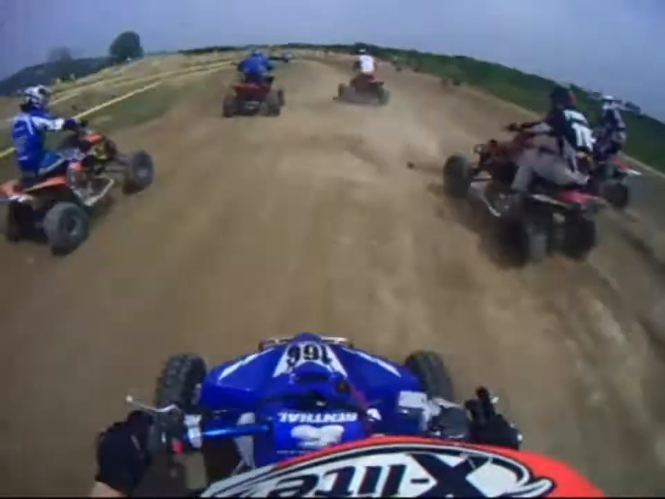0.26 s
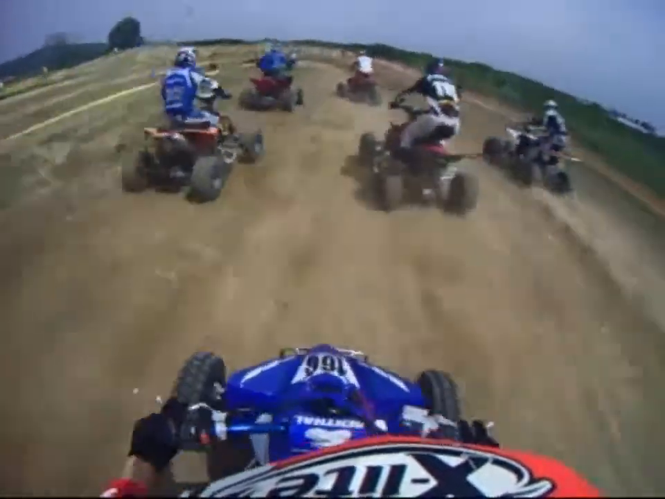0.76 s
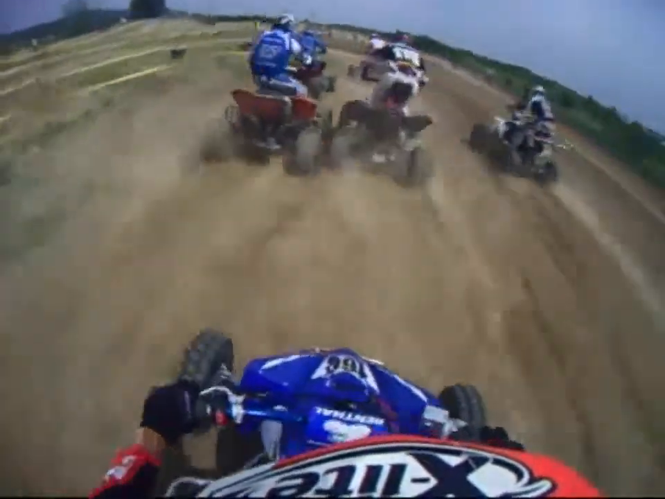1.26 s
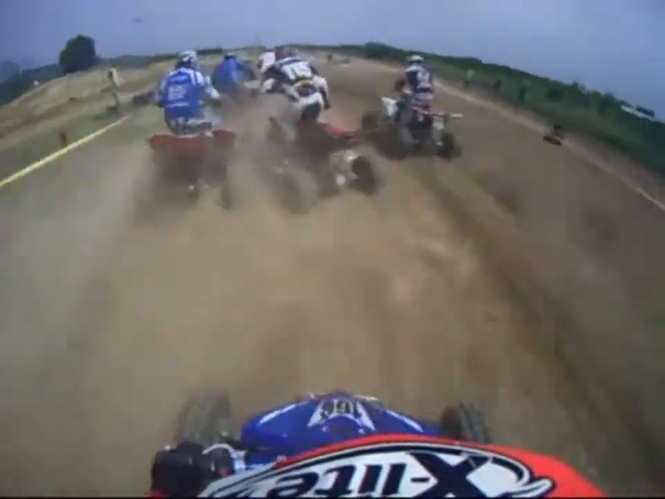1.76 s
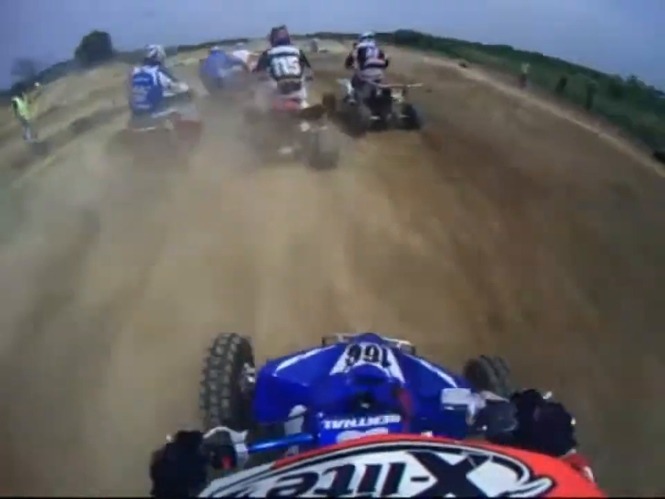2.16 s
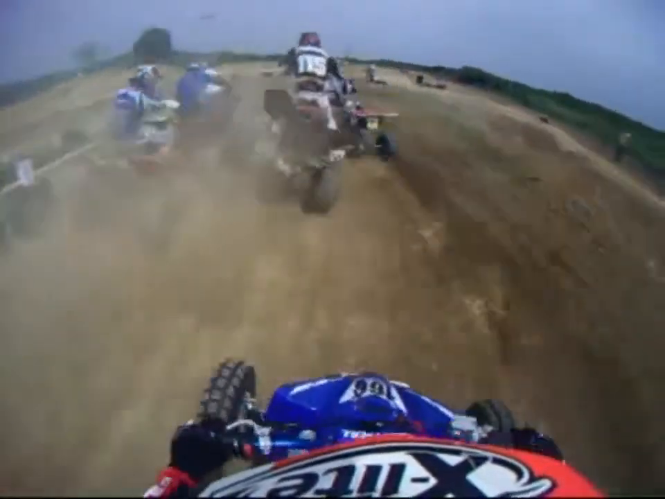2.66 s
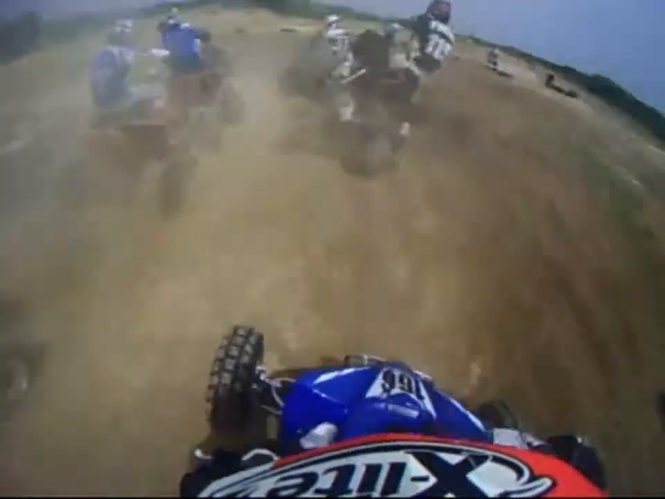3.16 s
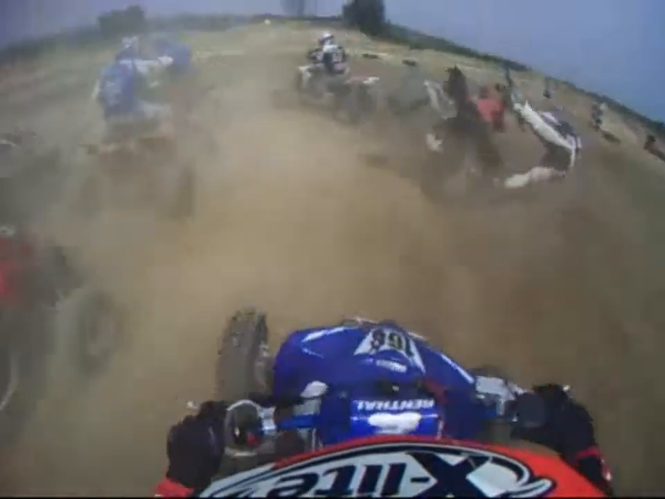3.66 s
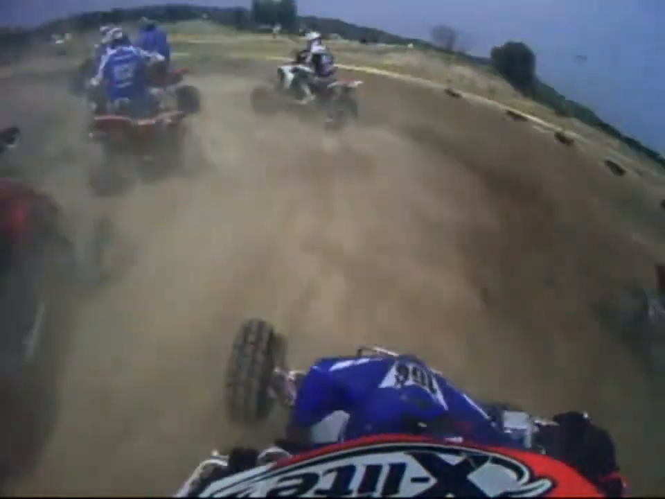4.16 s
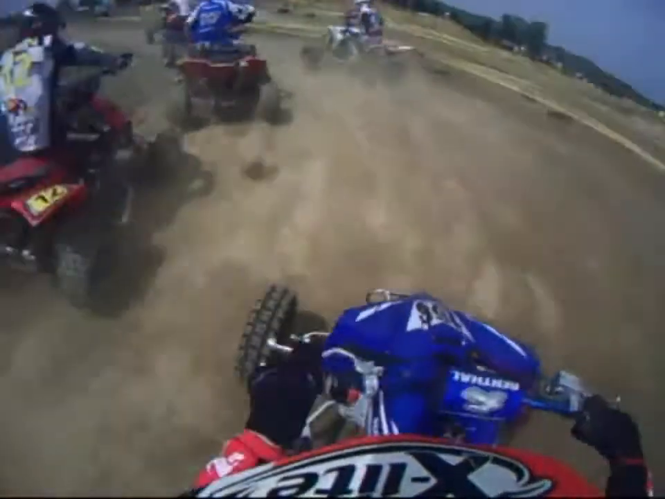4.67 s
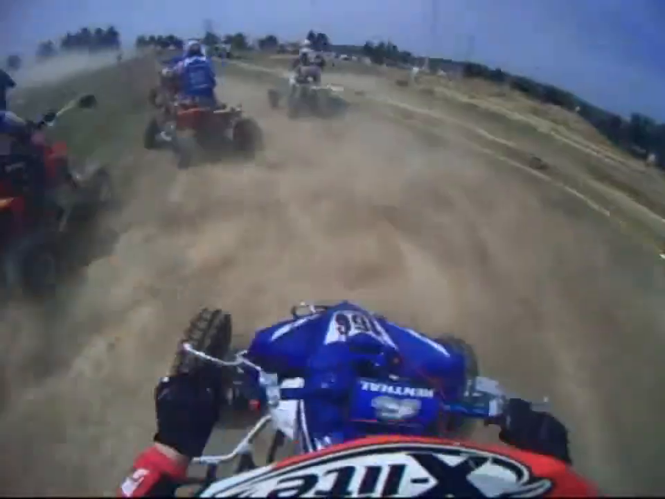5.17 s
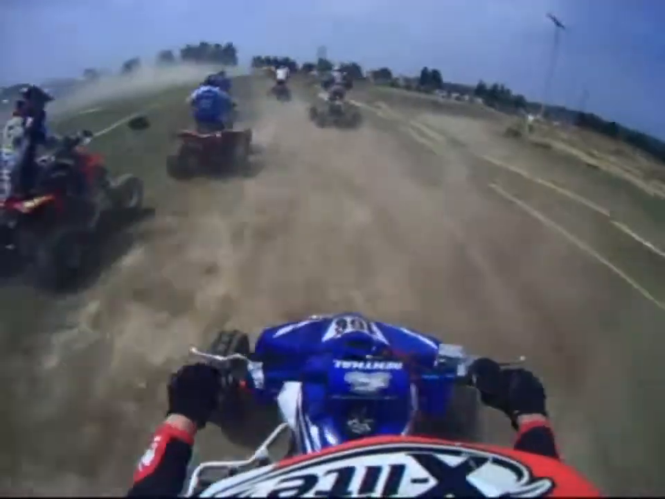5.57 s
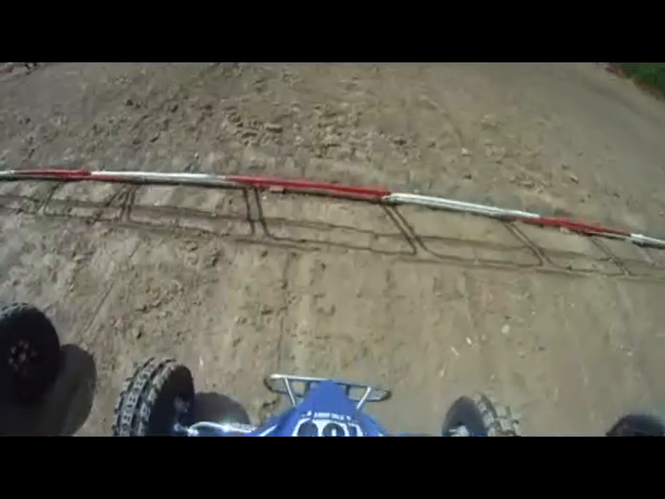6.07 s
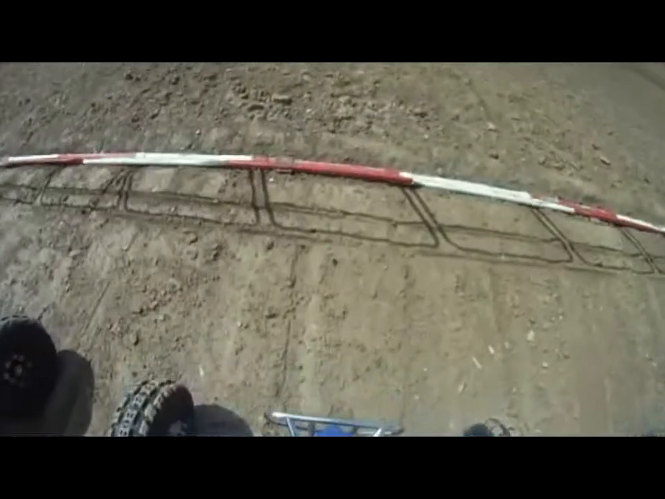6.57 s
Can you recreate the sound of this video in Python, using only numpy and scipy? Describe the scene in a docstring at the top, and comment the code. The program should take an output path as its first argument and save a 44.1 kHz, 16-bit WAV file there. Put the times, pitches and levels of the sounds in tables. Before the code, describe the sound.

From a microphone shut in a plastic case on a rider's helmet outdoors, a single-cylinder quad barks at open throttle, with sharp cracks, then quietens into distant pack rumble and wind thumps. Throttle bursts return and climb, ease off, then a very short silence cuts to far louder, brighter revving among several engines.

```python
"""Single-cylinder quad bikes race on dirt, heard by a helmet camera shut in a plastic case; a cut leads to revving
at the start gate. Each firing is a burst of gas noise with a shrill ring near 2.4 kHz, over a thump and a pipe note.
The hardest firings, backfires and clacks add short bursts; pipes of near and neighbouring engines sing as gliding
multiples of a firing rate, and the pack roars all around. Wind is deep buffeting noise with low damped thumps.
Both cameras sample slowly, so a mirror image of the sound stands above half their rate."""
import sys
import numpy as np
from scipy import signal
from scipy.fft import rfft, irfft, next_fast_len
from scipy.io import wavfile
from scipy.ndimage import uniform_filter1d

SR = 44100
rng = np.random.default_rng(int(sys.argv[2]) if len(sys.argv) > 2 else 0)


def transcribe(signal):
    """Save signal, clipped to [-1, 1], as a 16-bit WAV file at the path in sys.argv[1]."""
    frames = np.atleast_2d(signal).T
    limited = np.clip(frames, -1, 1)
    pcm = np.round(limited * 32767).astype(np.int16)
    wavfile.write(sys.argv[1], SR, pcm)


def makeup_ratio(level_db):
    """Linear amplitude ratio for a level in decibels (20 dB per factor of ten)."""
    decades = np.asarray(level_db, float) / 20
    return 10 ** decades


N = 300762
T = np.arange(N) / SR
SIZE = next_fast_len(N + 8192)  # room for filters to ring out
HZ = np.arange(SIZE // 2 + 1) * SR / SIZE + 1e-3  # just above zero, so that its logarithm exists


# Spells of open throttle on the nearest engines. Each spell holds: rows (t/s, firing rate f/Hz, about),
# blast level/dB at each row, level/dB of the part under 1.5 kHz at each row,
# and (level/dB of extra sizzle, level/dB of ground echo); all levels are relative
THROTTLE_SPELLS = [ ([(.012, 66), (.277, 66), (.325, 66), (.4, 68), (.471, 70), (.53, 68), (.662, 68)],
                   [-23, -20, -19, -16, -18, -20, -30], [-2, 2, -1, -2, -2, 1, 4], (-9, -6)), ([(1.587, 56),
                   (1.625, 56), (1.664, 58), (1.732, 60), (1.827, 64), (1.856, 65), (1.873, 65),
                   (1.921, 63), (1.968, 62), (2.001, 61), (2.035, 61), (2.085, 60)],
                   [-32, -32, -26, -31, -37, -23, -21, -39, -30, -28, -34, -42],
                   [0, 10, 7, 7, 4, 0, 1, 4, 5, 1, 4, 4], (6, -3)), ([(3.013, 25), (3.085, 31), (3.141, 39),
                   (3.158, 45), (3.254, 42), (3.298, 42)], [-36, -33, -41, -33, -34, -41],
                   [7, 7, 6, 4, 4, 5], (3, -3)), ([(3.316, 38), (3.343, 34), (3.371, 40), (3.416, 50),
                   (3.45, 64), (3.464, 72)], [-22, -18, -16, -19, -18, -19], [-6, -2, -5, -2, -1, 2],
                   (10, -2)), ([(3.707, 64), (3.738, 64), (3.807, 56)], [-30, -25, -34], [5, 3, 2],
                   (5, -2)), ([(3.834, 40), (3.907, 43), (3.975, 46), (4.016, 49), (4.113, 54), (4.193, 68),
                   (4.267, 67), (4.366, 72), (4.45, 68)], [-31, -23, -22, -23, -22, -25, -25, -32, -28],
                   [-6, -6, -7, -6, -3, 1, 0, 1, -1], (-6, -8)), ([(4.546, 60), (4.613, 63), (4.691, 62),
                   (4.735, 66), (4.78, 70), (4.93, 77), (5.021, 76), (5.116, 74), (5.222, 75), (5.287, 76),
                   (5.361, 62)], [-29, -22, -29, -37, -29, -20, -21, -21, -24, -22, -23],
                   [-2, -4, 0, 0, -3, -4, -4, -1, 3, 1, 4], (0, -12)), ([(5.435, 56), (5.601, 60),
                   (5.733, 60), (5.866, 60)], [-24, -27, -30, -32], [3, 4, 3, 5], (-9, -8)), ([(5.95, 55),
                   (6.023, 55), (6.092, 57)], [-7, -9, -12], [3, 2, -2], (-9, -9)), ([(6.175, 52),
                   (6.229, 58), (6.304, 72), (6.319, 72), (6.343, 74), (6.443, 66), (6.535, 64), (6.63, 64),
                   (6.648, 62), (6.734, 62), (6.768, 60), (6.785, 58), (6.819, 58)],
                   [-5, -4, -5, -14, -12, -10, -8, -7, -15, -13, -12, -3, -4],
                   [-2, 2, -2, 0, 1, 1, 0, -2, -4, -4, 0, -5, -1], (-9, -10))]
# Tone of the near exhaust pipe: (f/Hz, relative level/dB)
PIPE_TONE = [(40, -18), (70, -13), (130, -15.5), (300, -32.5), (450, -7), (700, -13), (1000, -12.5),
             (1500, -22.5)]


def near_engines():
    """Each firing thumps, then blasts gas that returns off the ground and rings the case; the pipe note is more even."""
    scatter_db, even = 2.5, 0.3  # spread of blast levels; share of it that the thump follows
    jitter_s, lead_s, thump_lead_s = 0.0003, 0.002, 0.001
    echo_delay_s = 0.0045
    rows_of_spells, loads, shares, places = zip(*THROTTLE_SPELLS)
    firing_s = np.concatenate([firings(rows) for rows in rows_of_spells])
    row_s = np.concatenate(rows_of_spells)[:, 0]
    low_db = np.interp(T, row_s, np.concatenate(shares))

    # sizzle and echo change just before each new spell
    changes_s = [rows[0][0] - 0.01 for rows in rows_of_spells[1:]]
    sizzle_db, echo_db = np.array(places)[np.searchsorted(changes_s, T)].T

    level_chance, time_chance = rng.standard_normal((len(firing_s), 2)).T
    blast_db = np.interp(firing_s, row_s, np.concatenate(loads))
    ring_hz = np.where(first_shot(), 2500, 2260)
    gas = blasts(firing_s - lead_s + jitter_s * time_chance, blast_db + scatter_db * level_chance,
                 decay_s=0.0024, rise_s=0.0005, crack=4.5, ring=0.45, ring_hz=ring_hz, stray_hz=220)
    thump = strikes(firing_s - lead_s - thump_lead_s, blast_db + even * scatter_db * level_chance)
    echo = np.pad(gas, (int(echo_delay_s * SR), 0))[:N]
    gas = gas + makeup_ratio(echo_db) * echo

    rasp = makeup_ratio(-2.5) * case(gas, False)
    high_pass = signal.butter(4, 3150, "high", fs=SR, output="sos")
    sizzle = signal.sosfilt(high_pass, rasp)
    bark = makeup_ratio(-11) * case(gas, True) + makeup_ratio(10.5) * case(thump, True)
    pipe_note = makeup_ratio(25) * colour(thump, gains(PIPE_TONE))
    return rasp + makeup_ratio(sizzle_db) * sizzle + makeup_ratio(low_db) * bark + pipe_note


def firings(rows):
    """Firing times: a whole number of cycles fits between rows, while the rate glides evenly."""
    times = []
    for (s0, rate0), (s1, rate1) in zip(rows, rows[1:]):
        mean_rate = (rate0 + rate1) / 2
        u = np.linspace(0, 1, num=200)
        phase = (rate0 * u + (rate1 - rate0) * u ** 2 / 2) / mean_rate
        cycles = max(round((s1 - s0) * mean_rate), 1)
        times += list(s0 + (s1 - s0) * np.interp(np.arange(cycles) / cycles, phase, u))
    return np.array(times + [rows[-1][0]])


# The hardest firings, backfires and sharp clacks: (t/s, relative level/dB, level/dB of the part under 1.5 kHz)
HARD_BURSTS = [(0.0937, -10, -38.5), (0.3228, -10.5, -42), (0.4689, 0.5, -14), (0.6847, -8.5, -20),
               (0.6981, -14.5, -6), (1.506, -25, -4.5), (2.45, -32, -11), (3.5738, -22, -34),
               (3.834, -29, -21), (4.017, -23.5, 2), (4.093, -29, -6), (4.2647, -21, -3.5),
               (4.311, -30, -13), (4.363, -24, -15), (4.8339, -14, -7), (4.953, -23, -12),
               (4.964, -19, -14), (5.286, -17.5, -13.5), (6.1925, -11, 6.5), (6.533, -18, -19),
               (6.581, -8.5, -14), (6.6263, -11, -14)]


def hard_bursts():
    """Hardest firings, backfires and clacks: each a short burst of gas with a crack and a ring, through the case."""
    s, db, low_db = np.transpose(HARD_BURSTS)
    bang = blasts(s, db, decay_s=0.0023, rise_s=0.00067, crack=2.2, ring=0.4)
    low_gain = makeup_ratio(-7 + np.interp(T, s, low_db))
    return makeup_ratio(-2) * case(bang, False) + low_gain * case(bang, True)


# Pipes of near and neighbouring engines singing while they pull:
# (start t/s, length t/s, first firing rate f/Hz, rate at the turn f/Hz, relative level/dB, pipe resonance f/Hz)
PIPE_NOTES = [(-.06, 0.38, 59.9, 69.3, -34.5, 308), (.18, 0.29, 63.26, 62.5, -36.5, 128),
              (0.405, 0.1, 59.8, 69.6, -32.5, 297), (0.721, 0.2, 60.06, 68.8, -38, 330),
              (1.618, 0.41, 56.3, 65, -49.5, 120), (3.1, 0.13, 86.8, 86.4, -43.5, 170),
              (3.664, 0.14, 57.6, 69.3, -38.5, 320), (1.611, .12, 54, 61.1, -45.5, 450),
              (4.4, 0.25, 62.3, 64.2, -44.5, 130), (4.86, 0.16, 79.7, 84.4, -44.5, 170),
              (5.05, 0.65, 69.4, 79, -62, 230), (5.46, 0.17, 44.8, 54.2, -55, 105),
              (4.8, 0.73, 70, 78.6, -45, 380), (2.1, 0.29, 73.6, 65.1, -46.5, 139),
              (2.55, 0.5, 51.9, 55.7, -55.5, 161), (6.3, 0.36, 65.74, 62.14, -32, 417),
              (5.623, 0.34, 55.7, 68.1, -35, 299), (5.95, 0.31, 53.7, 65.95, -32, 110),
              (6.188, 0.15, 60.1, 73.9, -27, 66), (6.45, 0.21, 63.34, 68.4, -22.5, 108),
              (6.7, 0.11, 63.4, 70.1, -23.5, 115)]


def pipe_notes():
    """Clean multiples of a firing rate that glides to a turn and starts back, loudest near the pipe's resonance."""
    turn, fade_share = 0.632, 0.12  # as shares of the note's length
    floor_db, pipe_width_hz = -17, 74  # floor: strength of multiples far from the resonance
    out = np.zeros(N)
    k = np.arange(1, 13)[:, None]
    for s, length, hz0, hz1, db, pipe_hz in PIPE_NOTES:
        on = slice(max(int(s * SR), 0), min(int((s + length) * SR), N))
        u = np.clip((T[on] - s) / length, 0, 1)
        hz = hz0 + (hz1 - hz0) * np.sin(np.pi / 2 * u / turn)
        resonance = 1 / (1 + (2 * (k * hz - pipe_hz) / pipe_width_hz) ** 2)
        gain = makeup_ratio(db) * (makeup_ratio(floor_db) + resonance)
        phase = 2 * np.pi * np.cumsum(hz) / SR
        fade = np.clip(np.minimum(u, 1 - u) / fade_share, 0, 1)
        # k squared staggers the starting phases
        out[on] += np.sqrt(2) * fade * np.sum(gain * np.sin(k * phase + k ** 2), axis=0)
    return out


# The pack drawing off and closing in: (t/s, roar through the case level/dB, exhaust rumble level/dB), relative
PACK_LEVELS = [(0, -29, -30.5), (.28, -30, -36.5), (.5, -37, -35.5), (.85, -40.5, -37.5),
               (1.03, -42.5, -41), (1.5, -47, -41.5), (1.66, -48.5, -40.5), (2.06, -49, -42),
               (2.9, -49.5, -41.5), (3.62, -45.5, -38), (3.72, -36.5, -33.5), (3.86, -49, -40),
               (4.2, -46, -36.5), (4.5, -39, -37), (5.05, -46, -33), (5.35, -30.5, -29), (5.55, -35, -31.5),
               (5.86, -41, -37), (5.95, -19, -22), (6.13, -16, -20.5), (6.2, -23, -25), (6.31, -22, -26.5),
               (6.4, -17.5, -25), (6.6, -16.5, -21.5), (6.66, -19, -27), (6.82, -19, -25.5)]
# Three further engines, a list for each: (t/s, firing rate f/Hz)
PACK_RATES = [
    [(0, 42), (1.05, 59), (2, 57), (2.95, 35), (4.3, 45), (5.5, 37), (6.1, 52), (6.82, 60)],
    [(0, 80), (1.75, 63), (2.75, 53), (3.6, 66), (4.9, 55), (5.6, 56), (6, 71), (6.82, 67)],
    [(0, 64), (1, 73), (2.7, 80), (3.5, 50), (4.9, 82), (5.6, 79), (6, 64), (6.82, 76)],
]
# Tone of the exhaust rumble: (f/Hz, relative level/dB)
RUMBLE_TONE = [(40, -2), (70, -8), (130, -2), (200, -7), (300, -8.5), (420, -12.5), (700, -58)]


def pack():
    """Further engines: their long blasts blur into a throbbing roar over a lumpy rumble."""
    steady = 0.35  # unbroken noise beside the throb
    scatter_db, even, jitter_s = 4, 0.3, 0.0004
    roar_db, rumble_db = curve(PACK_LEVELS)
    # the part under 1.5 kHz gains on the rest as the roar fades with distance
    middle_db = np.where(first_shot(), -1, -2.5) - 0.18 * (roar_db + 44.5)

    phases = [np.cumsum(curve(rows)[0]) / SR for rows in PACK_RATES]
    firing_s = np.concatenate([np.interp(np.arange(1, p[-1]), p, T) for p in phases])
    level_chance, time_chance = rng.standard_normal((len(firing_s), 2)).T
    firing_s = firing_s + jitter_s * time_chance

    throb = unit(blasts(firing_s, scatter_db * level_chance, decay_s=0.022, rise_s=0.0016, crack=1.7))
    roar = throb + steady * rng.standard_normal(N)
    beat = strikes(firing_s, even * scatter_db * level_chance)
    middle = roar + 1.3 * unit(beat)
    tone = gains(RUMBLE_TONE)
    rumble = unit(colour(beat, tone)) + 0.5 * unit(colour(rng.standard_normal(N), tone))
    return (makeup_ratio(roar_db) * unit(case(roar, False)) + makeup_ratio(roar_db + middle_db) * unit(case(middle, True))
            + makeup_ratio(rumble_db) * unit(rumble))


# Wind thumps as gusts strike the microphone: (t/s, relative level/dB, f/Hz, time to fall by 60 dB t/s)
WIND_THUMPS = [(0.599, -11, 36, 0.24), (0.732, -11.5, 29.5, 0.16), (2.438, -7.5, 38.8, 0.15),
               (4.811, -21, 35, 0.29), (4.919, -19.5, 38, 0.39), (5.489, -16.5, 34.8, 0.2)]


def wind_thumps():
    """A gust strikes the microphone: a low sine, 29 to 39 Hz, that swells quickly and dies away."""
    onset_s = 0.022
    out = 0
    for s, db, hz, t60 in WIND_THUMPS:
        t = np.maximum(T - s, 0)
        envelope = (1 - np.exp(-t / onset_s)) * np.exp(-np.log(1000) * t / t60)
        out = out + makeup_ratio(db) * envelope * np.sin(2 * np.pi * hz * t)
    return out


# Wind on the microphone, calmer while the bike slows for the bend: (t/s, relative level/dB before the buffets)
WIND_LEVELS = [(0, -38.5), (2, -42.5), (3.4, -46), (4.4, -50), (4.8, -42), (5.86, -47), (5.95, -32),
               (6.82, -43)]


def wind():
    """Air buffets the microphone: deep noise whose level wanders at random."""
    gust_db, gust_s = 5, 0.091  # spread and smoothing length of the buffets
    hold = int(gust_s * SR)
    gusts = unit(uniform_filter1d(uniform_filter1d(rng.standard_normal(N), hold), hold))
    tone = gains([(8, -29), (20, 5.5), (45, -7.5), (70, -24), (120, -52)])
    air = unit(colour(rng.standard_normal(N), tone))
    return makeup_ratio(curve(WIND_LEVELS)[0] + gust_db * gusts) * air


# Resonances of each camera case, a list for each: (f/Hz, width f/Hz, relative level/dB)
CASE_RESONANCES = [
    [(380, 180, -12), (580, 56, -23.5), (925, 260, -23), (1177, 27, -9.5), (1510, 70, -13.5),
     (2081, 95, -8), (2508, 256, -6), (2838, 160, -9.5), (3456, 118, -19)],
    [(370, 49, -6.5), (640, 20, -2), (963, 106, 2.5), (1490, 300, -11.5), (2137, 190, 1.5), (2446, 227, 2),
     (3000, 170, -9), (3390, 52, -6.5), (3645, 250, -9), (4200, 71, -32), (4905, 150, -17.5)],
]
# What each case lets through between its resonances, a list for each: (f/Hz, relative level/dB)
CASE_LEAKAGE = [
    [(100, -47.5), (300, -25), (600, -11.5), (1100, -15), (1800, -16), (3000, -18.5), (3550, -17),
     (3900, -41), (4100, -81.5)],
    [(100, -28.5), (300, -14.5), (500, -5.5), (750, -20.5), (1300, -12.5), (3000, -30.5), (4100, -22.5),
     (5600, -27), (6100, -35)],
]


def case(x, low):
    """Through the case in use: the part under (low) or over 1.5 kHz, white noise leaving as loud as it came."""
    out = []
    for modes, wall in zip(CASE_RESONANCES, CASE_LEAKAGE):
        power = gains(wall) ** 2
        for hz, width, db in modes:
            peak = makeup_ratio(2 * db) / (1 + (2 * (HZ - hz) / width) ** 2) ** 1.38
            power = power + peak * (HZ < wall[-1][0])
        power = power / (1 + (HZ / 1500 if low else 1500 / HZ) ** 12)
        out.append(colour(x, np.sqrt(power / power.mean())))
    return np.where(first_shot(), *out)


def blasts(s, db, decay_s, rise_s, crack, ring=0.0, ring_hz=2400, stray_hz=330):
    """A crack and a swelling, dying puff at each time: gas noise, plus a shrill ring whose pitch strays."""
    clicks = strikes(s, db)
    puff = clicks
    for t in (decay_s, rise_s):
        puff = signal.lfilter([1], [1, -np.exp(-1 / (t * SR))], puff)
    stray = unit(uniform_filter1d(uniform_filter1d(rng.standard_normal(N), size=90), size=90))
    shrill = np.sin(2 * np.pi * np.cumsum(ring_hz + stray_hz * stray) / SR)
    gas = rng.standard_normal(N) + ring * shrill
    return puff / (rise_s * SR) * gas + crack * clicks


def strikes(s, db):
    """One single-sample click at each time."""
    clicks = np.zeros(N)
    np.add.at(clicks, np.clip((s * SR).astype(int), 0, N - 1), makeup_ratio(db))
    return clicks


def first_shot():
    """True at every moment before the second shot starts."""
    return T < SHOTS[1][0]


def curve(rows):
    """Draws the columns of a table as straight lines along time."""
    s, *columns = np.transpose(rows)
    return [np.interp(T, s, c) for c in columns]


def gains(points):
    """Gain at every frequency from (f/Hz, level/dB) points, almost nothing past both ends."""
    hz, db = np.transpose(points)
    return makeup_ratio(np.interp(np.log(HZ), np.log(hz), db, left=-90, right=-90))


def colour(x, gain):
    """Filters with this gain and the least delay, as a body rings only after it is struck."""
    # folding the cepstrum (transform of the log gain) gives the phase
    cepstrum = irfft(np.log(gain + 1e-6), SIZE)
    cepstrum[1:SIZE // 2] *= 2
    cepstrum[SIZE // 2 + 1:] = 0
    return irfft(rfft(x, SIZE) * np.exp(rfft(cepstrum)), SIZE)[..., :N]


def unit(x):
    """Scales a sound to an rms (average strength) of 1."""
    return x / np.sqrt(np.mean(x ** 2))


def scene():
    """All sources add up at one microphone."""
    return (near_engines() + hard_bursts() + pipe_notes() + pack() + wind_thumps() + wind())[None]


def band_limit(x):
    """A steep low-pass at the top of the band."""
    return signal.sosfilt(signal.butter(12, 16370, fs=SR, output="sos"), x)


# The two shots: (start t/s, end t/s, camera sample rate f/Hz, top f/Hz)
SHOTS = [(0, 5.87, 8000, 5720), (5.942, 6.83, 12000, 15200)]
# Gain of the mirror image in each camera, a list for each: (f/Hz, level/dB)
MIRROR_GAIN = [
    [(3900, -56), (4150, -2.5), (4600, -9.5), (5200, -21.5), (5800, -39)],
    [(5900, -43), (6200, -0.5), (8000, -5), (10000, -14), (12000, -32), (14000, -22.5), (15600, -21)],
]


def record(dry):
    """Peaks are rounded; each camera adds its mirror image and cuts the top; silence lies between the shots."""
    out = 0
    dry = np.tanh(0.58 * dry) / 0.69
    for (start, end, rate, top), mirror in zip(SHOTS, MIRROR_GAIN):
        # multiplying by a tone at the sample rate flips the spectrum about half that rate
        flipped = 2 * dry * np.cos(2 * np.pi * rate * T)
        image = colour(flipped, gains(mirror))
        low_pass = signal.ellip(10, 0.5, 95, top, fs=SR, output="sos")
        shot = signal.sosfilt(low_pass, dry + image)
        out = out + shot * ((T >= start) & (T < end))
    return band_limit(out)


dry = scene()
out = record(dry)
transcribe(out)
```